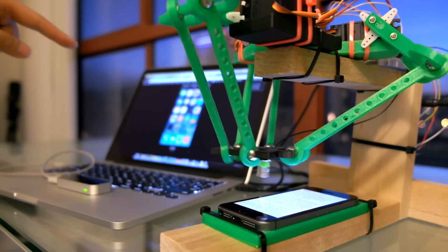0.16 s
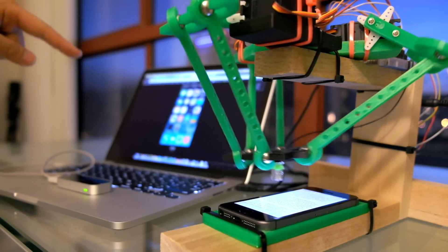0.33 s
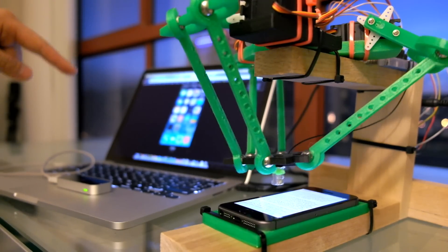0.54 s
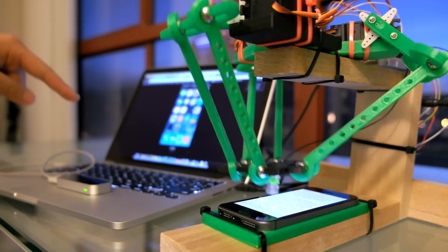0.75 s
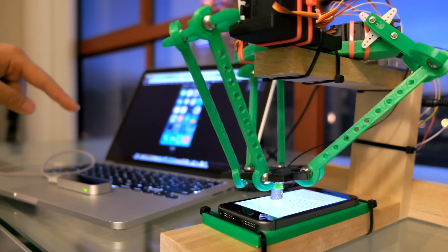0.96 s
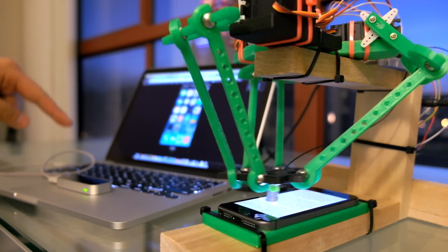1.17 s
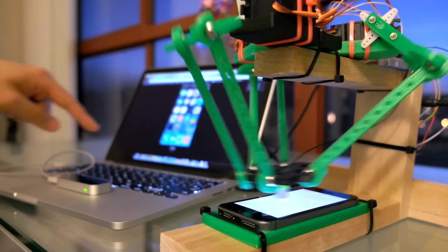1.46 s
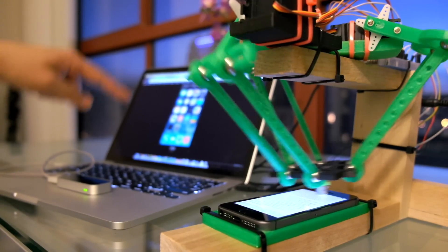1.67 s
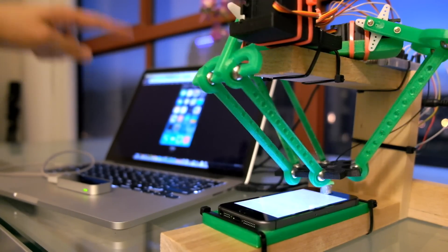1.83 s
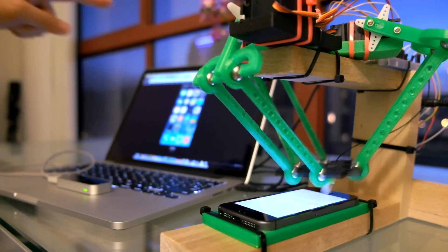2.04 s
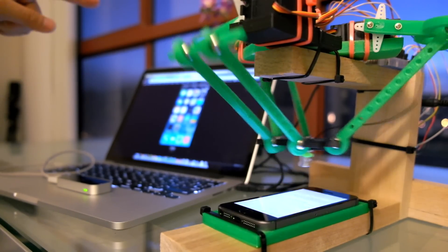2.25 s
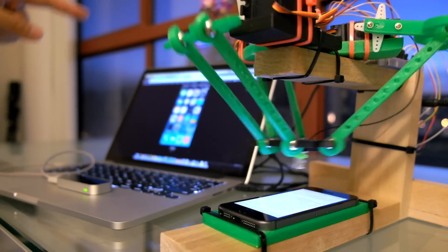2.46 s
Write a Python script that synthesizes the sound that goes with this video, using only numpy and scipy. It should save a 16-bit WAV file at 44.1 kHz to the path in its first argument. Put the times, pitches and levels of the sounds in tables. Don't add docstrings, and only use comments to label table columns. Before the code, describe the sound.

Robot arm servos whirr in short wavering bursts, with squeaks and a knock, over room hum

```python
import sys
import numpy as np
from scipy import signal
from scipy.fft import rfft, irfft
from scipy.io import wavfile
from scipy.ndimage import uniform_filter1d

SR = 44100
rng = np.random.default_rng(int(sys.argv[2]) if len(sys.argv) > 2 else 0)


def linear_from_db(decibels):
    return 10 ** (np.asarray(decibels, float) / 20)


def put_to_file(sound):
    columns = np.atleast_2d(sound).T
    safe = np.clip(columns, -1, 1)
    whole_steps = np.round(safe * 32767)
    wavfile.write(sys.argv[1], SR, whole_steps.astype(np.int16))


N = 114660
T = np.arange(N) / SR


def evened(x):
    return x / np.sqrt(np.mean(x ** 2) + 1e-20)


def colour(x, spectrum):
    freq_hz, level_db = np.transpose(spectrum)
    hz = np.fft.rfftfreq(len(x), 1 / SR)
    gain = linear_from_db(np.interp(np.log(hz + 1), np.log(freq_hz + 1), level_db))
    return irfft(rfft(x) * gain, len(x))


def drift(smooth_ms, size=N):
    wide = max(int(smooth_ms * SR / 1000), 1)
    smooth = uniform_filter1d(rng.standard_normal(size), wide)
    return evened(uniform_filter1d(smooth, wide))


def phase(hz):
    return 2 * np.pi * np.cumsum(hz) / SR


def resonate(x, hz, width_hz):
    turn = np.exp(1j * phase(hz * np.ones(len(x))))
    r = np.exp(-np.pi * width_hz / SR)
    return 2 * (turn * signal.lfilter([1 - r], [1, -r], x / turn)).real


def ringing_noise(hz, width_hz, skirt_hz):
    return resonate(resonate(rng.standard_normal(N), hz, width_hz), hz, skirt_hz)


def add(mix, start_s, sound):
    at = round(start_s * SR)
    part = mix[max(at, 0):][:len(sound) + min(at, 0)]
    part += sound[max(-at, 0):][:len(part)]


# freq_hz, level_db
HUM_SPECTRUM = [(25, -69), (52, -46), (62, -44), (100, -27.5), (150, -11.5), (400, -5), (800, -6),
                (1700, -16), (14000, -63.5)]
# freq_hz, level_db
HUM_WIDTH = [(500, 0), (1500, 2.5), (8000, 6.5)]
# freq_hz, width_hz, level_db
ROOM_TONES = [(355.4, 40, -12), (449.6, 49, -12), (577.5, 43, -14)]
# time_s, level_db
HUM_SWELL = [(0, -47.5), (.25, -52), (.5, -51.5), (.66, -55.5), (1.5, -55.5), (1.7, -48), (1.95, -50.5),
             (2.1, -52), (2.3, -48), (2.6, -49)]


def hum():
    side_db, lean, patch_db, level_db = -7, 0.19, 1.52, 1.5
    bins = signal.stft(rng.standard_normal((2, N)), nperseg=1024)[2]
    patch = uniform_filter1d(rng.standard_normal(bins.shape[1:]), size=5, axis=0)
    patch = evened(uniform_filter1d(patch, size=5, axis=1))
    mid, side = signal.istft(bins * linear_from_db(patch_db * patch), nperseg=1024)[1][:, :N]
    mid = evened(colour(mid, HUM_SPECTRUM))
    side = linear_from_db(side_db) * evened(colour(colour(side, HUM_SPECTRUM), HUM_WIDTH))
    for hz, width_hz, db in ROOM_TONES:
        mid = mid + linear_from_db(db) * evened(ringing_noise(hz, width_hz, width_hz))
    side = side + lean * mid
    swell = linear_from_db(level_db + np.interp(T, *np.transpose(HUM_SWELL)))
    return np.array([mid + side, mid - side]) * swell


def room(x):
    t60_s = 0.25
    t = T[:SR // 2]
    echoes = rng.standard_normal((2, len(t))) * (rng.random((2, len(t))) < .05)
    tail = echoes * linear_from_db(-60 * t / t60_s) * (t > .004)
    tail = signal.lfilter([1], [1, -.6], tail)
    return signal.fftconvolve(x[None], tail / np.linalg.norm(tail[0]), axes=1)[:, :N]


# start_s, level_db
KNOCKS = [
    (2.1647, -26.8),
    (2.1704, -27),
    (2.1869, -29),
    (2.258, -48),
    (2.3132, -42),
    (2.3189, -40.5),
]
# freq_hz, level_db, t60_s
FRAME_MODES = [(340, -15, .08), (580, -15, .5), (756, -6, .03), (859, -24, .27), (1000, -11, .4),
               (1110, 2.5, .19), (1176, 1.4, .22), (1270, -12, .14), (1344, -9, .22), (1436, -8, .15),
               (1527, -15, .24)]
# start_s, level_db, ring_hz, edge_db
CLICKS = [
    (1.1203, -37, 650, 4),
    (1.1264, -38, 800, -14),
    (.955, -44, 520, -14),
    (.478, -43, 600, -8),
]


def knocks():
    shudder_s, shudder_db = .03, -44
    thud_db, thud_hz, thud_s = -8, 634, 0.0013
    click_t60_s = .03
    frame, clicks, t = np.zeros(N), np.zeros(N), T[:SR // 2]
    ring = sum(linear_from_db(db - 60 * t / t60_s) * np.sin(2 * np.pi * hz * t) for hz, db, t60_s in FRAME_MODES)
    for start_s, db in KNOCKS:
        rattle = linear_from_db(shudder_db) * rng.standard_normal(len(t)) * np.exp(-t / shudder_s)
        strike = rattle + (t == 0)
        soft_start = np.minimum(t / .001, 1)
        add(frame, start_s, linear_from_db(db) * soft_start * signal.fftconvolve(strike, ring)[:len(t)])
        thud = np.sin(2 * np.pi * thud_hz * t) * np.exp(-t / thud_s)
        add(clicks, start_s, linear_from_db(db + thud_db) * thud)
    for start_s, db, hz, edge_db in CLICKS:
        edge = linear_from_db(edge_db) * np.sin(2 * np.pi * 2.5 * hz * t) * np.exp(-t / .0006)
        body = linear_from_db(-60 * t / click_t60_s) * np.sin(2 * np.pi * hz * t)
        add(clicks, start_s, linear_from_db(db) * (edge - body))
    return colour(frame + clicks, [(3200, 0), (4500, -25), (8000, -60)])


# start_s, length_s, from_hz, to_hz, level_db
SQUEALS = [(0.416, 0.038, 1860, 1930, -59), (.705, 0.041, 2403, 2600, -67), (.757, 0.034, 2480, 2560, -60),
           (0.754, .016, 4120, 4170, -68), (.762, .02, 2950, 2980, -62), (2.15, .03, 4750, 4700, -58),
           (2.19, .025, 4500, 4600, -57), (2.175, .03, 3800, 3950, -59), (2.128, .016, 4000, 4300, -59),
           (1.55, .05, 4560, 4500, -58), (1.6, .02, 5050, 5200, -62), (1.5, .025, 4350, 4200, -58),
           (1.58, .03, 4500, 3950, -57), (1.434, 0.044, 2550, 2613, -53.5),
           (2.1205, 0.0099, 2300, 2330, -45), (2.13, 0.052, 2810, 2770, -52.5),
           (2.138, 0.044, 1750, 1926, -56.5), (2.149, 0.022, 4220, 3980, -55),
           (2.173, 0.047, 2143, 2344, -44), (2.21, 0.041, 2340, 2430, -38.5),
           (2.244, 0.049, 2397, 2480, -43.5), (2.293, 0.031, 2140, 1970, -43),
           (2.322, .034, 3650, 2700, -52), (2.56, .03, 2570, 2540, -61), (2.117, .014, 4500, 4500, -64),
           (2.161, 0.015, 2786, 2760, -46.5), (2.215, 0.045, 4700, 4750, -53.5),
           (2.223, 0.068, 2047, 2060, -48.5), (2.238, 0.029, 2278, 2230, -50),
           (2.276, 0.047, 4470, 4100, -58), (1.475, .03, 4150, 4200, -67), (1.69, 0.052, 4600, 4650, -59),
           (1.735, 0.07, 4100, 4090, -67), (1.8, 0.042, 2510, 2530, -59)]


def squeals():
    octave_db, wobble_hz, throb_db = -22, 48, 3.3
    grainy_below_db, grain_db = -56, .35
    out = np.zeros(N)
    for start_s, length_s, from_hz, to_hz, db in SQUEALS:
        wobble, throb = drift(1.27, size=4410), drift(2.8, size=4410)
        u = np.arange(0, length_s, 1 / SR) / length_s
        angle = phase(from_hz + (to_hz - from_hz) * u + wobble_hz * wobble[:len(u)])
        tone = np.sin(angle) + linear_from_db(octave_db) * np.sin(2 * angle)
        depth_db = throb_db + grain_db * max(grainy_below_db - db, 0)
        swell = np.sin(np.pi * u ** 0.71) ** .5
        add(out, start_s, linear_from_db(db + 5.0 + depth_db * throb[:len(u)]) * swell * tone)
    return out


# start_s, length_s, tick_db, ticks_per_s, fizz_db
SPINS = [
    (-.1, 0.16, -87, 340, -79),
    (0.136, 0.25, -80, 170, -88.5),
    (0.358, 0.15, -86, 300, -77.5),
    (0.676, 0.28, -84, 250, -88.5),
    (1.355, 0.41, -78, 190, -102),
    (1.504, 0.34, -68, 250, -78),
    (2.105, .29, -72, 350, -58.5),
    (2.47, 0.19, -84, 230, -78),
]
# freq_hz, level_db
TICK_SPECTRUM = [(6000, -38), (8500, -10.5), (10500, -1.8), (11700, -9), (13000, -29), (15600, -47)]
# freq_hz, level_db
FIZZ_SPECTRUM = [(3000, -15), (5500, 8), (9000, 0), (11500, -9), (13200, -29), (14300, -22), (15600, -30)]


def brushes():
    hiss = 0.57
    ticks, fizz = np.zeros((2, N))
    for start_s, length_s, tick_db, ticks_per_s, fizz_db in SPINS:
        noise, wander, lumps = rng.standard_normal(SR), drift(5.5, size=SR), drift(21.5, size=SR)
        u = np.arange(0, length_s, 1 / SR) / length_s
        turns = np.cumsum(ticks_per_s * (1 + 0.082 * wander[:len(u)])) / SR
        puffs = evened((hiss + 2 * np.exp(-(turns % 1) / .3)) * noise[:len(u)])
        swell = np.sin(np.pi * u) ** 1.13 * linear_from_db(2.0 * lumps[:len(u)])
        add(ticks, start_s, linear_from_db(tick_db) * puffs * swell)
        add(fizz, start_s, linear_from_db(fizz_db) * puffs[::-1] * swell)
    return 4.6 * colour(ticks, TICK_SPECTRUM) + 2.77 * colour(fizz, FIZZ_SPECTRUM)


# time_s, effort_db, mesh_hz
LEAD_MOVES = [
    [(0, -54, 2600), (.06, -65, 2600)],
    [(.12, -63.5, 2900), (.32, -56, 2600), (.44, -53, 2800), (.52, -61, 2600), (.6, -80, 2500)],
    [(.68, -64.5, 2400), (.72, -60, 2500), (.745, -65, 2550), (.77, -51.5, 2900), (.8, -59.5, 2900),
     (.88, -59.5, 2700), (.93, -77, 2600)],
    [(1.2, -78, 2500), (1.27, -58.5, 2600), (1.34, -76, 2500)],
    [(1.41, -66, 2600), (1.43, -55.5, 2550), (1.485, -53, 2700), (1.51, -41, 2480), (1.56, -36.5, 2560),
     (1.66, -38, 2600), (1.7, -43, 3120), (1.73, -43, 3080), (1.745, -35.5, 2800), (1.77, -43.5, 2450),
     (1.8, -47.5, 2600), (1.86, -65, 2450)],
    [(2.11, -86, 2400), (2.125, -49, 2500), (2.17, -41, 2300), (2.285, -41.5, 2250), (2.345, -48, 2900),
     (2.39, -55, 2600), (2.44, -67, 2500)],
    [(2.49, -63.5, 2600), (2.575, -43.5, 2550), (2.6, -53, 2600)],
]
# time_s, effort_db, ring_hz
SECOND_MOVES = [
    [(0, -71, 4340), (.255, -72.5, 4100), (.275, -59.5, 3900), (.32, -54, 3980), (.4, -59.5, 4100),
     (.44, -58, 4450), (.49, -72, 4300), (.52, -87, 4450)],
    [(.69, -78, 4230), (.71, -73, 4200), (.88, -75, 4360), (.92, -86, 4300), (1.21, -86, 4260),
     (1.25, -70, 4200), (1.31, -75, 3900)],
    [(1.46, -96, 4120), (1.475, -63, 3970), (1.52, -49.5, 4070), (1.6, -46.5, 4050), (1.66, -51, 4300),
     (1.7, -51, 4530), (1.76, -53, 4430), (1.82, -69, 4300), (1.87, -83, 4440)],
    [(2.11, -91, 4450), (2.122, -49.5, 4360), (2.18, -43, 4120), (2.23, -51.5, 4320), (2.3, -48, 4200),
     (2.37, -57, 4120), (2.43, -72, 4320)],
    [(2.49, -74, 4200), (2.57, -51, 4500), (2.6, -57, 4130)],
]


def whine(effort_db, mesh_hz):
    sings_above_db, slope = -44, 0.51
    blur_hz, wobble, tone_share = 380, .02, .62
    shaft_per_s = 58 * (1 + .25 * drift(20))
    swing = .065 * np.sin(phase(shaft_per_s))
    tone = linear_from_db(1.6 * drift(2.5)) * np.sin(phase(mesh_hz * (1 + wobble * drift(3) + swing)))
    fuzz = ringing_noise(mesh_hz, blur_hz, 2 * blur_hz)
    mesh = evened(tone_share * evened(tone) + (1 - tone_share) * evened(fuzz))
    case = linear_from_db(-4) * evened(ringing_noise(2600, 360, 720))
    return (mesh + case) * linear_from_db(-3 + slope * np.minimum(effort_db - sings_above_db, 0))


# ratio_to_ring, width_hz, level_db
CASE_STRANDS = [(.97, 290, 0), (1.08, 290, -1.5), (1.24, 500, -7), (.88, 300, -9)]


def second_case(ring_hz):
    strands = np.zeros(N)
    for ratio, width_hz, db in CASE_STRANDS:
        noise = rng.standard_normal(N)
        strand = resonate(noise, ratio * ring_hz * (1 + .012 * drift(10)), width_hz)
        strand = resonate(strand, ratio * ring_hz, 3 * width_hz)
        strands += linear_from_db(db + 1.5 * drift(8)) * evened(strand)
    return evened(strands)


# freq_hz, level_db
RASP_SPECTRUM = [(700, -63), (1600, -16.5), (2000, -4), (2500, 1.9), (3100, -0.5), (3600, -9.5),
                 (5500, -25), (7000, -37.5), (13000, -36)]


def rasp(effort_db):
    noise = rng.standard_normal(N) * linear_from_db(0.82 * drift(1.8))
    level_db = -3 - 0.56 * np.maximum(effort_db + 51.5, 0)
    return linear_from_db(level_db) * evened(colour(noise, RASP_SPECTRUM))


def gears():
    lead_s, lead_db, mesh_hz = np.concatenate(LEAD_MOVES).T
    second_s, second_db, ring_hz = np.concatenate(SECOND_MOVES).T
    effort_db = np.interp(T, lead_s, lead_db)
    lead = whine(effort_db, np.interp(T, lead_s, mesh_hz)) + rasp(effort_db)
    second = linear_from_db(np.interp(T, second_s, second_db)) * second_case(np.interp(T, second_s, ring_hz))
    return colour(linear_from_db(effort_db) * lead + linear_from_db(-3.0) * second, [(9000, 0), (13000, -8)])


# freq_hz, level_db
MIC = [(60, -40), (200, -6), (400, 0)]


def scene():
    arm = colour(gears() + brushes() + squeals(), MIC)
    frame = colour(knocks(), MIC)
    arm_pan_db, frame_pan_db = np.array([[2.5], [-3]]), np.array([[1.5], [-1.5]])
    near = arm * linear_from_db(arm_pan_db) + frame * linear_from_db(frame_pan_db)
    return near + linear_from_db(-20.5) * room(arm + frame) + hum()


def roll_off(x):
    return signal.sosfilt(signal.butter(12, 15610, fs=SR, output="sos"), x)


def record(dry):
    return roll_off(dry)


dry = scene()
out = record(dry)
put_to_file(out)
```